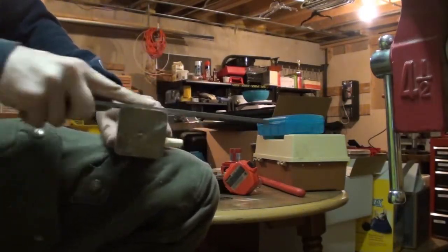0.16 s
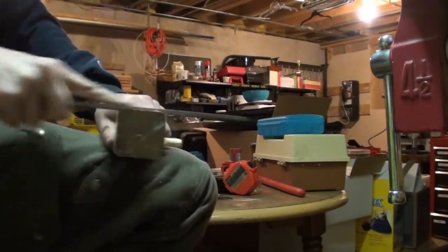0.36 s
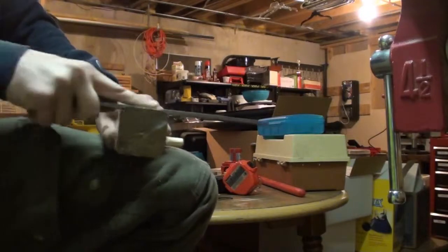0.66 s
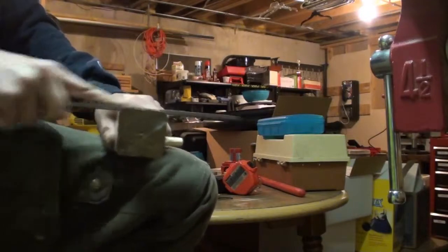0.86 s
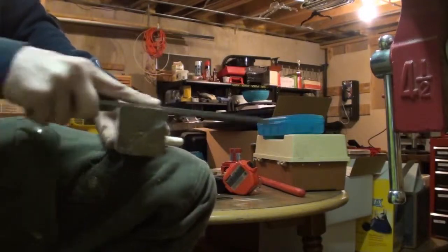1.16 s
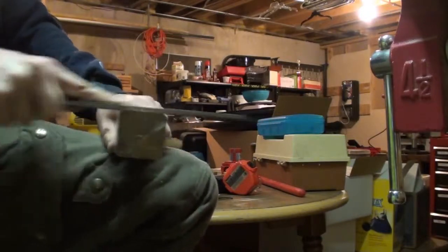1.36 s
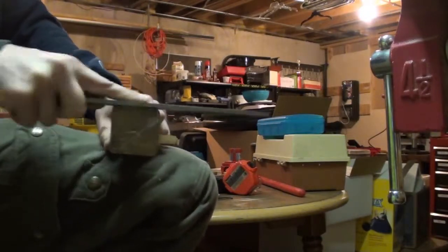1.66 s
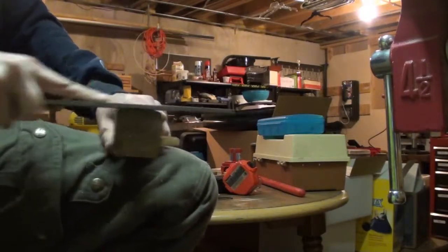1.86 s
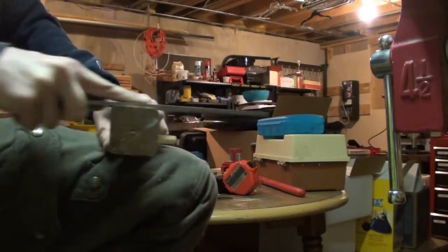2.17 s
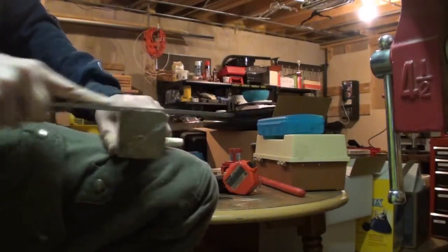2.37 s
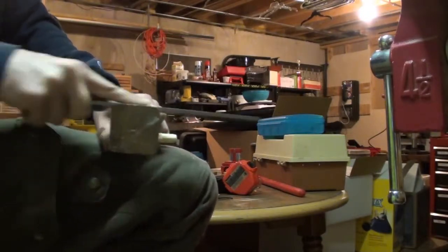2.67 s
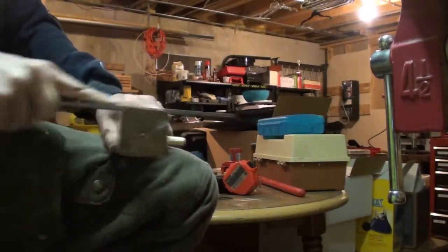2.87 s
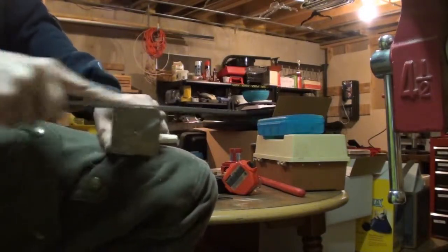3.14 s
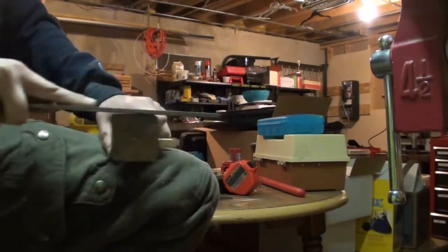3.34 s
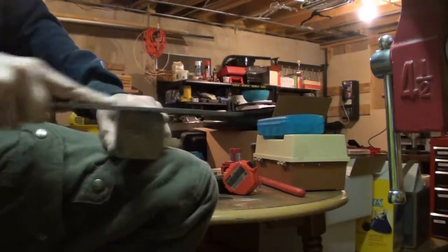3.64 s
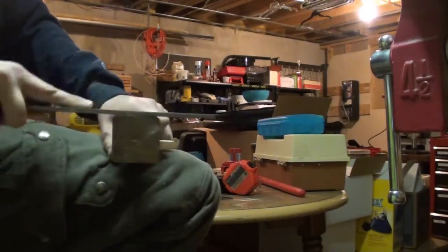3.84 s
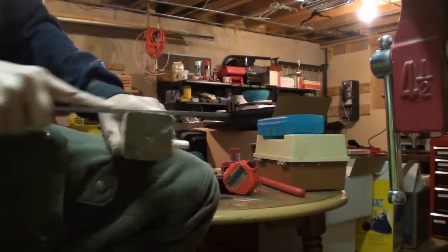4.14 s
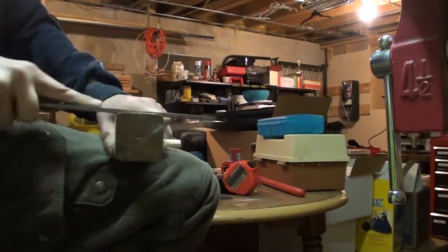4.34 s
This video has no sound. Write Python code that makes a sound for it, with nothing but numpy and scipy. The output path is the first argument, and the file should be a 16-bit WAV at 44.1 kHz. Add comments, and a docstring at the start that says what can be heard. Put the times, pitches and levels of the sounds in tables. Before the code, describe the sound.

A steel file rasps back and forth over a wooden block in fast, even, bright strokes, close up in a small basement workshop.

```python
"""A steel hand file rasps to and fro, eight strokes a second, over the edge of a wooden block held on a knee.
Each stroke mixes clicks of two crossing tooth rows, at a rate that follows the hand's speed, with noise of
tearing fibres; resonances of wood and steel colour both. Stick-slip tones make squeaks and chirps, decaying
noise makes taps, and low oscillations make bumps on the knee. A close microphone hears it in a small
basement workshop: noise tails give the room's echo, and filtered noise a faint low rumble."""
import sys
import numpy as np
from scipy import signal
from scipy.fft import rfft, irfft, next_fast_len
from scipy.io import wavfile

SR = 44100
rng = np.random.default_rng(int(sys.argv[2]) if len(sys.argv) > 2 else 0)


def pcm_store(signal):
    """Save signal as 16-bit PCM."""
    levels = np.round(np.clip(np.atleast_2d(signal), -1, 1) * 32767)
    wavfile.write(sys.argv[1], SR, levels.astype(np.int16).T)


N = 198538
SIZE = 10240  # samples given to one event

# resonances of the block and the low ones of the blade: f/Hz, half-power width/Hz, level over the spectrum/dB
WOOD_MODES = [(450, 50, 3), (880, 110, 7), (1150, 60, 2), (1440, 100, 7), (1620, 120, 6), (2170, 220, 6)]
# bending modes of the blade, damped by hand and block: f/Hz, half-power width/Hz, level over the spectrum/dB
STEEL_MODES = [(3169, 77, 15), (3440, 197, 13), (4287, 107, 18.5), (4810, 160, -9), (5658, 85, 19),
               (7155, 71, 20.5), (9050, 260, 5)]
# smooth spectrum of teeth knocking on wood: f/Hz, relative level per Hz/dB
CHATTER_SPECTRUM = [(100, -66), (350, -12), (620, -18.5), (820, 0), (1200, 3.5), (1700, 4.5), (2400, 3),
                    (3000, -25.5), (4500, -21), (9000, -66)]
# forward strokes, which cut: start t/s, length/s, nominal level/dB, bite (chatter relative to that level)/dB
PUSHES = [(-.03, 0.12, -15.5, -8), (0.221, .11, -14, -7.5), (0.472, .112, -15, -7), (0.716, .13, -15, -12),
          (.969, .13, -17, -10.5), (1.231, 0.11, -14.5, -4.5), (1.483, .11, -14.5, -3),
          (1.742, 0.1, -15.5, -3), (1.988, 0.09, -17, -6), (2.246, 0.11, -14, -5.5),
          (2.494, .11, -14.5, -12), (2.737, 0.12, -17.5, -13), (2.995, .11, -14.5, -6),
          (3.254, 0.12, -15, -1), (3.511, .11, -15, -2), (3.764, 0.12, -14, -4.5), (4.02, .102, -15, -8.5),
          (4.262, 0.12, -19, -9.5)]
# return strokes, which skate: start t/s, length/s, nominal level/dB, bite (chatter relative to that level)/dB
PULLS = [(.092, 0.12, -14.5, -7.5), (0.345, 0.12, -14.5, -7), (0.593, 0.13, -15.5, -10),
         (0.836, 0.13, -21.5, -13), (1.093, .12, -18.5, -8), (1.353, 0.13, -15.5, -8.5),
         (1.605, 0.12, -15.5, -8), (1.873, .1, -15.5, -8.5), (2.121, 0.091, -15, -5),
         (2.369, .11, -18, -9.5), (2.609, 0.12, -16.5, -10.5), (2.869, .11, -17, -11.5),
         (3.119, 0.11, -17, -7), (3.379, 0.11, -16.5, -9.5), (3.641, 0.11, -15.5, -10.5),
         (3.9, .1, -16.5, -8), (4.151, .072, -16, -12), (4.394, .11, -17.5, -7)]


def amp(db):
    """Level to amplitude: 20 dB is a factor of ten."""
    return 10 ** (np.asarray(db) / 20)


def unit(x):
    """Power normalization: scale to rms 1."""
    return x / np.sqrt(np.mean(x ** 2) + 1e-20)


def along(points, hz):
    """Logarithmic frequency scale: interpolate (f/Hz, value) points along it."""
    f, v = np.transpose(points)
    return np.interp(np.log(hz + 1), np.log(f + 1), v)


def wobble(rate, size):
    """Band-limited random fluctuation: Gaussian knots, `rate` a second, joined by straight lines."""
    place = np.arange(size) * (rate / SR)
    i = place.astype(int)
    fraction = place - i
    knots = rng.standard_normal(size // 8)
    return knots.take(i, mode="wrap") * (1 - fraction) + knots.take(i + 1, mode="wrap") * fraction


def filtered(x, response):
    """Linear filtering: multiply the spectrum of x by a response of frequency."""
    m = next_fast_len(N + SR // 4)
    return irfft(rfft(x, m) * response(np.fft.rfftfreq(m, 1 / SR)), m)[..., :N]


def add(track, s, x):
    """Superposition: mix x into the track from time s, cut at the track's ends."""
    i = round(s * SR)
    part = x[..., max(-i, 0):max(N - i, 0)]
    track[..., max(i, 0):max(i, 0) + part.shape[-1]] += part


def rumble():
    """Broadband noise filtered to the basement's low rumble, as separate mid and side at rms 1."""
    # the rumble's spectrum: f/Hz, relative level/dB
    rumble_spectrum = [(15, -45), (25, -8.5), (270, 5), (348, 1), (413, 8.5), (600, 3), (780, 8),
                       (1320, -120)]
    noise = filtered(rng.standard_normal((2, N)), lambda hz: amp(along(rumble_spectrum, hz)))
    return unit(noise[0]), unit(noise[1])


def workshop(x, wet_db):
    """Reverberation: direct sound plus a short noise tail from shelves and walls, new as the hands move."""
    # decay of the room: f/Hz, time to fall by 60 dB/s
    decay_times = [(150, 0.78), (1000, 0.43), (4000, 0.24), (8000, 0.22), (15000, 0.19)]
    hz = np.fft.rfftfreq(256, 1 / SR)
    t = np.arange(SIZE // 128) * 128 / SR
    noise = rng.standard_normal((2, len(hz), 2 * len(t))).view(complex)
    fading = noise * amp(-60 * t / along(decay_times, hz)[:, None])
    tail = signal.istft(fading, nperseg=256)[1]
    tail *= 1 - np.exp(-np.arange(tail.shape[1]) / SR / 0.0007)  # soft onset
    mid_side = amp(wet_db) * tail / np.linalg.norm(tail[0])
    mid_side[0, 0] += 1  # the direct sound, in the mid only
    return signal.fftconvolve(x[None], mid_side, axes=1)


def stereo(track):
    """Mid-side stereophony: the rumble joins the room's mid and side, then a slight left-right lean."""
    # the room's width: f/Hz, gain of its side signal/dB
    side_gain = [(100, -48), (400, -14), (1300, -7), (4000, -10.5), (8500, -5), (12000, -36), (16000, -30)]
    # the lean: f/Hz, left minus right/dB
    left_lean = [(200, 0), (600, -.6), (1300, .1), (2400, 1), (8500, 1.2), (11000, 0)]
    rumble_mid, rumble_side = rumble()
    mid = track[0] + amp(-55.0) * rumble_mid
    side = filtered(track[1], lambda hz: amp(along(side_gain, hz))) + amp(-69) * rumble_side
    left_right = np.array([mid + side, mid - side])
    return filtered(left_right, lambda hz: amp(np.outer([.5, -.5], along(left_lean, hz))))


def body(x, spectrum, modes, vary_db, detune):
    """Modal resonance, causal and at equal power; grip and contact point shift the modes a little each time."""
    hz = np.fft.rfftfreq(SIZE, 1 / SR)
    power = np.ones(len(hz))
    for centre, width, db in modes:
        offset = 2 * (hz - centre * (1 + detune * rng.normal())) / width
        power += amp(db + vary_db * rng.normal()) ** 2 / (1 + offset ** 2)
    # folding the cepstrum forward gives the minimum-phase response
    cepstrum = irfft(np.log(amp(along(spectrum, hz)) * np.sqrt(power)))
    cepstrum[1:SIZE // 2] *= 2
    cepstrum[SIZE // 2 + 1:] = 0
    response = np.exp(rfft(cepstrum))
    return unit(irfft(rfft(x) * response)) * np.sqrt(np.mean(x ** 2))


def sliding(x, u, spectrum, modes, vary_db, detune):
    """Moving excitation point: along the blade, the modes answer differently early and late in a stroke."""
    turn = np.pi / 2 * np.clip(2 * u - .4, 0, 1)  # equal-power crossfade
    early = body(x * np.cos(turn), spectrum, modes, vary_db, detune)
    late = body(x * np.sin(turn), spectrum, modes, vary_db, detune)
    return early + late


def tap():
    """Impact: a decaying noise burst knocks steel on the block and rings both; peak 1."""
    t = np.arange(SIZE) / SR
    burst = rng.standard_normal(SIZE) * np.exp(-t / .002)
    knock = body(burst, CHATTER_SPECTRUM, WOOD_MODES + STEEL_MODES, vary_db=2, detune=.01)
    return knock / np.abs(knock).max()


def taps():
    """Repeated impacts: the file touches down on the block."""
    # touchdowns: t/s, peak level of the direct knock/dB
    touchdowns = [(0.099, -17), (0.477, -23), (1.858, -26)]
    track = np.zeros((2, N))
    for s, db in touchdowns:
        add(track, s, workshop(amp(db) * tap(), wet_db=-3))
    return track


def squeak(length, hz, overtone_db, slide=0):
    """Stick-slip friction locks onto one bending mode; the tone swells, stutters and rings out."""
    t = np.arange(SIZE) / SR
    swell = np.sin(np.pi / 2 * np.clip(t / (0.47 * length), 0, 1)) ** 2
    fade = np.exp(-np.maximum(t - 0.92 * length, 0) / (0.3 * length))
    grip = swell * fade * amp(3 * wobble(250, size=SIZE))
    pitch = hz * (1 + slide * t) + 45 * wobble(500, size=SIZE)
    phase = 2 * np.pi * np.cumsum(pitch) / SR
    overtones = sum(np.sin(k * phase) * (2 / k) ** 1.3 for k in range(2, 10) if k * hz < 9000)
    return grip * (np.sin(phase) + amp(overtone_db + 3.3 * wobble(470, size=SIZE)) * overtones)


def squeaks():
    """Stick-slip oscillation: now and then the blade catches and sings out."""
    # catches: t/s, length/s, f/Hz, relative level/dB, overtone level/dB
    catches = [(0.158, .029, 1001, -23.5, -2.5), (0.493, 0.016, 4180, -14.5, -12),
               (0.741, 0.011, 4305, -18, -11), (0.851, 0.028, 1213, -29.5, -9),
               (.926, 0.027, 917, -17.5, -2), (0.982, 0.033, 4330, -16.5, -27),
               (1.118, 0.011, 5730, -15, -14), (2.381, 0.031, 1408, -26, -9), (4.181, 0.087, 881, -21, -6),
               (4.192, 0.054, 4305, -18, -30), (4.403, 0.028, 1140, -23.5, -2)]
    track = np.zeros((2, N))
    for s, length, hz, db, overtone_db in catches:
        add(track, s, workshop(amp(db + 2.0) * squeak(length, hz, overtone_db), wet_db=-9))
    return track


def chirp(when):
    """Faint stick-slip, by chance, at share `when` of a stroke: it rises as the hand speeds up, else falls."""
    chance, lowest_hz, highest_hz = .7, 1506, 6000
    hz = np.exp(rng.uniform(np.log(lowest_hz), np.log(highest_hz)))
    slide = 5 * np.sign(.3 - when)  # share of the pitch per second
    return (rng.random() < chance) * squeak(length=0.031, hz=hz, overtone_db=-10, slide=slide)


def bump(hz, attack, decay):
    """Damped oscillation: the cloth-damped block swings for a few cycles."""
    t = np.arange(SIZE) / SR
    phase = 2 * np.pi * np.cumsum(hz * (1 + 0.084 * wobble(86, size=SIZE))) / SR
    return (1 - np.exp(-t / attack)) * np.exp(-t / decay) * (np.sin(phase) + 0.38 * np.sin(0.546 * phase))


def dig(low_hz, high_hz, length):
    """Frequency and amplitude modulation: the first slow teeth rip a short, rough, rising note."""
    u = np.clip(np.arange(SIZE) / SR / length, 0, 1)
    rise = low_hz + (high_hz - low_hz) * np.sin(np.pi / 2 * u)
    rate = rise * (1 + 0.098 * wobble(389, size=SIZE))
    roughness = amp(3.5 * wobble(400, size=SIZE))
    return np.sin(np.pi * u) * roughness * np.sin(2 * np.pi * np.cumsum(rate) / SR)


def take_hold():
    """Onset transients: teeth dig in at every turn, lower and softer on a pull; a push also rocks the block."""
    # dig levels add to stroke level and bite; they fade as the edge wears smooth
    push_dig_db, pull_dig_db, dig_fade_db_per_s, dig_delay_s = -2.5, -18.5, -2.5, .004
    # the block rocks on the knee, more as the filing goes on
    bump_db, bump_growth_db_per_s, bump_delay_s = -43.5, 2.5, 0.02117
    track = np.zeros((2, N))
    for s, _, db, bite_db in PUSHES:
        rip_db = db + bite_db + push_dig_db + dig_fade_db_per_s * s
        rip = amp(rip_db) * dig(low_hz=650, high_hz=979, length=0.0324)
        rock = amp(bump_db + bump_growth_db_per_s * s) * bump(hz=267.0, attack=0.005, decay=0.014)
        add(track, s + dig_delay_s, workshop(rip, wet_db=-6.5))
        add(track, s + bump_delay_s, workshop(rock, wet_db=-16))
    for s, _, db, bite_db in PULLS:
        rip_db = db + bite_db + pull_dig_db + dig_fade_db_per_s * s
        rip = amp(rip_db) * dig(low_hz=274, high_hz=657, length=0.0166)
        add(track, s, workshop(rip, wet_db=-9.5))
    return track


def pulses(rate_hz, jitter, scatter_db):
    """Impulse train: one click, of uneven size, each time the running phase passes a whole number."""
    phase = np.cumsum(rate_hz * (1 + jitter * wobble(500, size=SIZE))) / SR
    at = np.flatnonzero(np.diff(np.floor(phase)) > 0)
    clicks = np.zeros(SIZE)
    clicks[at] = amp(scatter_db * rng.standard_normal(SIZE))[at]
    mean_size = np.exp(np.log(amp(scatter_db)) ** 2 / 2)
    return clicks - mean_size * rate_hz / SR  # the steady part of the push makes no sound


def double_cut_teeth(speed, tooth_hz):
    """Tooth-passing frequency: two crossing rows of different spacing click at rates set by the speed."""
    rate = tooth_hz * speed ** .8 * (1 + .05 * wobble(45, size=SIZE))
    upcut = pulses(rate, jitter=.055, scatter_db=2.2)
    overcut = .7 * pulses(rng.uniform(.66, .8) * rate, jitter=.065, scatter_db=2.2)
    # the rows take turns to bite as the file rolls a little
    roll = 1.1 * wobble(70, size=SIZE) + np.pi / 4
    return upcut * np.abs(np.cos(roll)) + overcut * np.abs(np.sin(roll))


def shaped(x, force):
    """Amplitude modulation: x under a force envelope, with that envelope's power."""
    return unit(x * force) * np.sqrt(np.mean(force ** 2))


def stroke(length, skew, tooth_hz, rasp_db, chatter_db, fizz_db, thump_db):
    """Friction excitation: as the hand speeds up and slows, tooth pitch arches and the cutting swells with it."""
    # smooth spectra of rasp, fizz and knee thump: f/Hz, relative level per Hz/dB
    rasp_spectrum = [(400, -27), (900, -42), (1800, 0.5), (3000, -0.5), (3800, -0.5), (4700, 8.5),
                     (6300, 4), (7600, 0.5), (8600, -42.5), (12000, -14.5)]
    fizz_spectrum = [(4000, -33), (7300, -11), (8400, 3.5), (9300, 0.5), (10000, -2.5), (11000, -4),
                     (12000, -12), (14000, -17.5), (16000, -31)]
    thump_spectrum = [(30, -64), (80, -40), (115, 0), (200, -6), (265, -0.5), (340, -11), (450, -20.5),
                      (900, -20.5)]
    # the teeth take this long to seat; the treble needs longer
    seat_s, fizz_seat_s = 0.004, 0.0058
    ease_db = 4  # the hand leans on the file at first and eases off by this much towards the end

    t = np.arange(SIZE) / SR
    u = np.clip(t / length, 0, 1)  # share of the stroke done
    speed = np.abs(np.sin(np.pi * u ** skew))  # skew under 1: fastest early
    grain = amp(.5 * wobble(130, size=SIZE))
    fibres = rng.standard_normal(SIZE) * amp(2.66 * wobble(3000, size=SIZE))  # clumps of tiny snaps
    teeth = double_cut_teeth(speed, tooth_hz)
    pressure = (1 - np.exp(-t / seat_s)) * amp(ease_db * (0.4675 - u))
    fizz_pressure = 1 - np.exp(-t / fizz_seat_s)

    def cut(tooth_share, drive, weight):
        """Saturating force: clicks mix with tearing fibres; cut depth levels off at speed and follows the grain."""
        force = weight * np.tanh(2 * drive) * grain * amp(.7 * wobble(200, size=SIZE))
        mix = tooth_share * shaped(teeth, force) + (1 - tooth_share) * shaped(fibres, force)
        return shaped(mix, force)

    # even a slow tooth knocks the block; only a fast one tears out treble
    knocks = cut(.62, speed ** 1.4, pressure)
    chatter = body(knocks, CHATTER_SPECTRUM, WOOD_MODES, vary_db=3, detune=.025)
    tearing = cut(.4, speed ** 1.9, pressure)
    rasp = sliding(tearing, u, rasp_spectrum, STEEL_MODES, vary_db=2, detune=.008)
    treble = cut(.3, speed ** 2.1, fizz_pressure)
    fizz = body(treble, fizz_spectrum, STEEL_MODES, vary_db=3, detune=.015)
    # the block drags on the knee as the stroke takes hold
    drag = shaped(fibres, speed ** 0.15 * np.exp(-1.5 * u))
    thump = body(drag, thump_spectrum, [], vary_db=0, detune=0)
    # a fixed trim balances each layer
    cutting = amp(rasp_db - 6.5) * rasp + amp(chatter_db - 5.0) * chatter
    return cutting + amp(fizz_db - 2.5) * fizz + amp(thump_db - 4.5) * thump


def filing(strokes, skew, tooth_hz, fizz_db, thump_db):
    """Periodic excitation: strokes of one kind, each with its chance of a chirp while the hand is fast."""
    chirp_db = -9.5  # relative to the stroke's nominal level
    track = np.zeros((2, N))
    for s, length, db, bite_db in strokes:
        cut = stroke(length, skew, tooth_hz, db, db + bite_db, db + fizz_db, db + thump_db)
        add(track, s, workshop(cut, wet_db=-8))
        when = rng.uniform(.12, .38)
        add(track, s + when * length, workshop(amp(db + chirp_db) * chirp(when), wet_db=-5))
    return track


def scene():
    """Superposition of pushes, pulls, one jam, squeaks and taps in the room, over a faint rumble."""
    # tooth_hz is the nominal top tooth rate; fizz and thump are relative to the stroke's level
    track = filing(PUSHES, skew=.62, tooth_hz=2237, fizz_db=-8, thump_db=-33)
    track += filing(PULLS, skew=.62, tooth_hz=2211, fizz_db=-6.5, thump_db=-36.5)
    # once the file jams and judders slowly over the edge
    jam_at_s, jam_s, jam_db, jam_bite_db = 4.187, 0.1, -15, -12.5
    jam = [(jam_at_s, jam_s, jam_db, jam_bite_db)]
    track += filing(jam, skew=0.94, tooth_hz=905, fizz_db=-33, thump_db=-48)
    track += take_hold() + squeaks() + taps()
    return stereo(track)


def record(dry):
    """Band limitation: a low-pass filter removes everything above its top frequency."""
    top_hz = 15800
    return filtered(dry, lambda hz: np.clip((top_hz - hz) / 100, 0, 1))


dry = scene()
out = record(dry)
pcm_store(out)
```